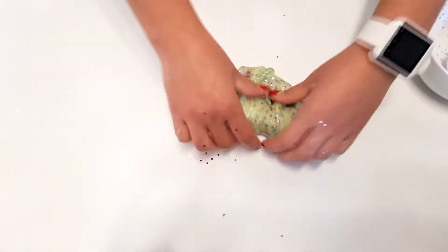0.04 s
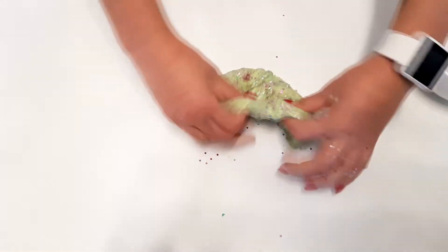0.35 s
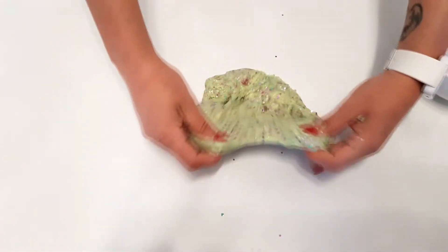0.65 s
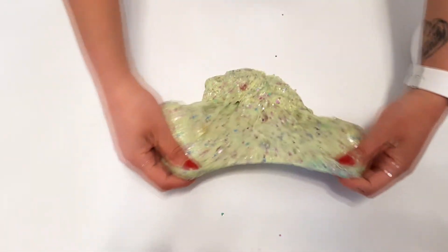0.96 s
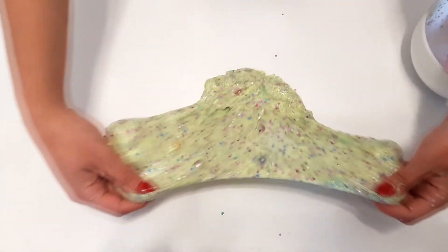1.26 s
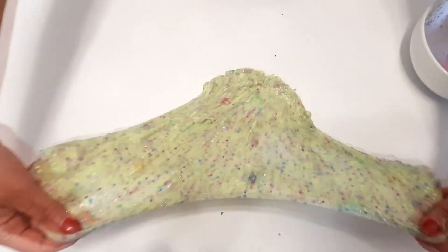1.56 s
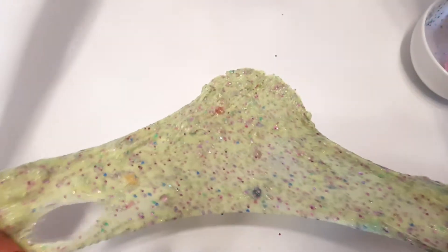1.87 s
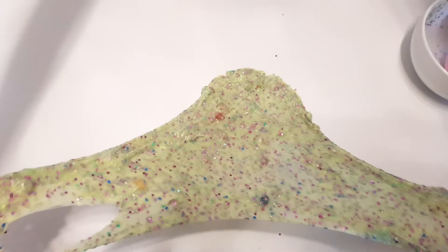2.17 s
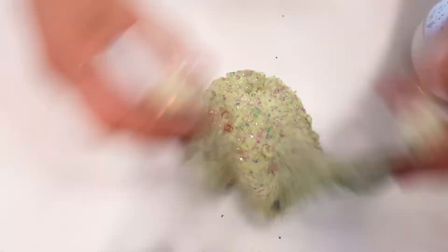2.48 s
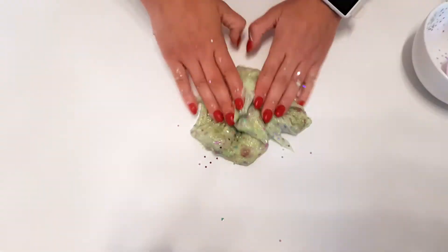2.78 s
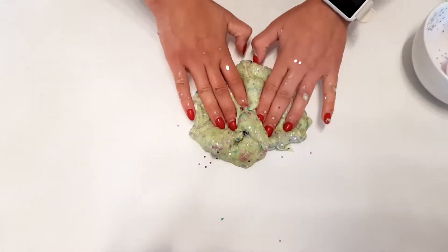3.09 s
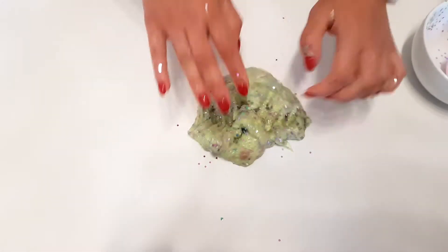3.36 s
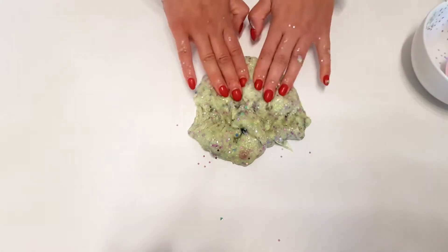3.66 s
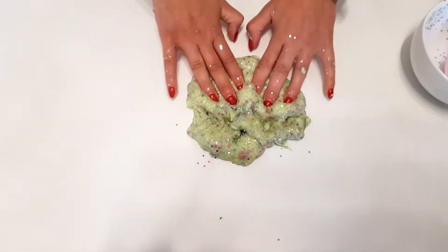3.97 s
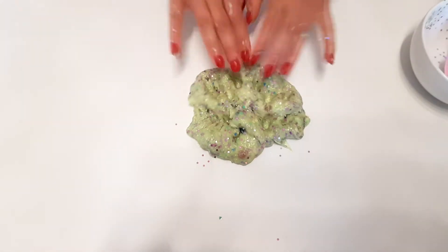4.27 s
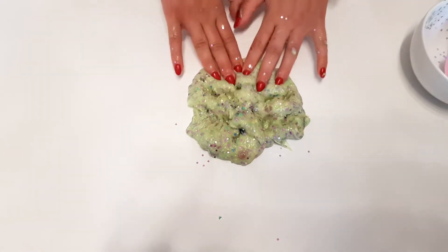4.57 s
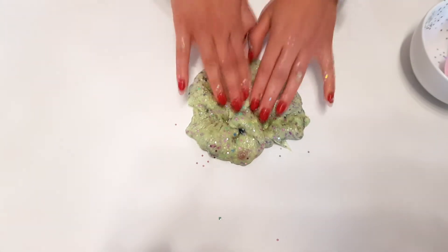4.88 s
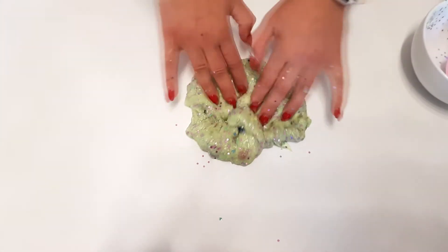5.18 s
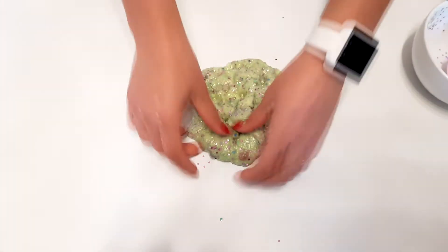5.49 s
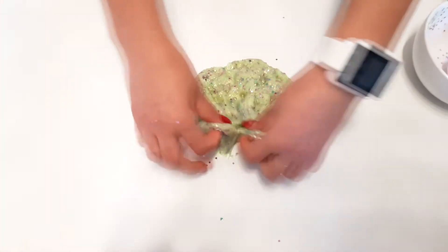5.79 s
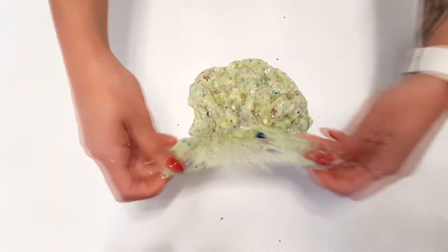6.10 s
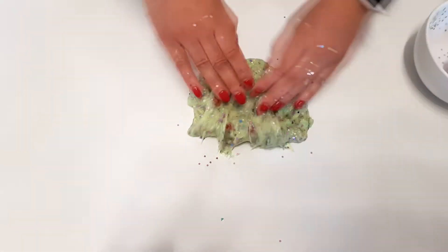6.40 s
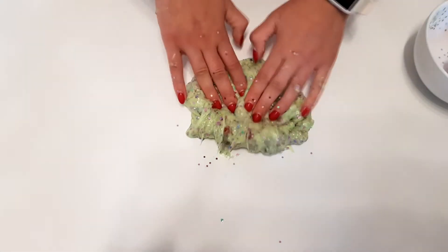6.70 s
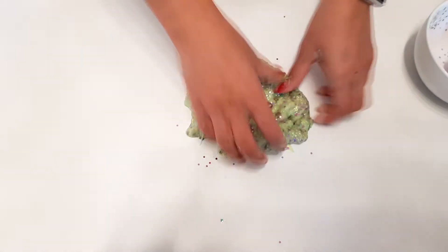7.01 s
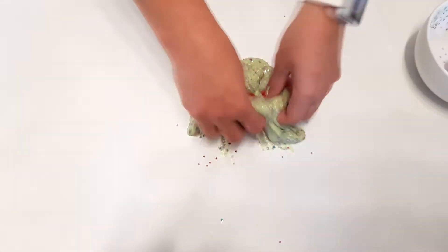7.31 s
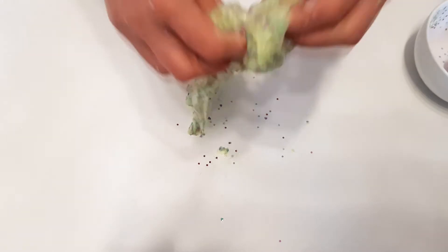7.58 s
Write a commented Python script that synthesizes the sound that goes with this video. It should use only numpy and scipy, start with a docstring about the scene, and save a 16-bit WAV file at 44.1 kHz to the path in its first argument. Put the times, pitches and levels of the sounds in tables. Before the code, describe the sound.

Two hands work sticky slime on a table, heard close up in a bare, reverberant room. It opens with a soft thud, a squelch and a few sharp bubble clicks. From about 0.5 to 2 seconds the slime is stretched, giving only a quiet, thinning crackle. At about 2.3 seconds it slaps down with a loud, wet thud. Fingers then press into it, with squelches, crisp snaps and small air pops around 3 seconds, and lighter sticky crackling until nearly 5 seconds. Wet smacks and folds follow from 5 to 5.7 seconds, then another brief stretch. From 6.5 seconds the kneading is denser, with a sharp, loud pop at 6.7, a hollow pop at 7 and squelching to the end near 7.8 seconds. Very faint bird whistles, insects and hiss lie behind, and a low rumble swells from about 4 seconds.

```python
"""Sticky slime is kneaded, stretched and folded by two hands on a table in a bare, lively room.
Tiny bubbles, each a damped oscillator, crackle as it peels off skin and table and squelch under the
fingers. Air pockets pop and ring as cavities, the stretched sheet slaps down, and the tabletop
shudders in its bending modes. The walls reverberate; birds, insects and a dull rumble lie faintly behind."""
import sys
import numpy as np
from scipy import signal
from scipy.fft import rfft, irfft, next_fast_len
from scipy.io import wavfile
from scipy.ndimage import uniform_filter1d

SR = 44100
rng = np.random.default_rng(int(sys.argv[2]) if len(sys.argv) > 2 else 0)


def generate_wav(signal):
    """Clip the signal to [-1, 1] and save it as 16-bit WAV at the path in sys.argv[1]."""
    frames = np.transpose(np.atleast_2d(signal))
    scaled = np.clip(frames, -1, 1) * 32767
    pcm = np.round(scaled).astype(np.int16)
    wavfile.write(sys.argv[1], SR, pcm)


N = 346185
TIME = np.arange(N) / SR

# spectra of dull push, wet squelch, sticky peel, wet smack and tearing pocket: f/Hz, level/dB
PUSH_SPECTRUM = [(30, -34), (60, -5.5), (90, -4.5), (120, -6.5), (160, -1.5), (235, 0), (330, -8.5),
                 (440, -4.5), (700, -3.5), (1100, -13), (2500, -60)]
SQUELCH_SPECTRUM = [(300, -25), (700, -2), (1000, 0.5), (1600, 1), (2500, -4), (4200, -5), (6000, -12.5),
                    (8000, -28), (16000, -53)]
PEEL_SPECTRUM = [(1000, -10), (3000, -6.5), (5000, -2), (6300, -4.5), (7500, -6), (9000, -1.5),
                 (12500, -0.5), (16000, -2.5)]
SMACK_SPECTRUM = [(150, -28.5), (600, -5.5), (1700, -1.5), (2600, -4), (4000, -13.5), (7000, -20),
                  (16000, -27)]
CRACK_SPECTRUM = [(200, -10.5), (750, 10), (1300, -29), (1800, 3), (2600, 1), (4200, -1.5), (6000, -1.5),
                  (7500, -9.5), (10000, -3.5), (16000, -21)]
# Event levels are relative: each source adds its own gain.
# finger squeezes: t/s at the height, build-up/s, let-go/s, push/dB, squelch/dB, peel/dB
SQUEEZES = [(0.0, .05, 0.17, -52, -53, -55.5), (.26, 0.094, 0.27, -70, -64, -67),
            (0.389, 0.056, 0.059, -68, -66, -57.5), (.74, 0.048, 0.084, -82, -72, -70),
            (2.365, 0.033, 0.14, -41, -45, -54), (2.43, 0.073, .22, -47.5, -47, -70),
            (2.629, 0.18, 0.1, -58.5, -52, -59.5), (2.81, 0.13, 0.21, -65.5, -57, -62),
            (2.957, 0.037, 0.23, -53.5, -48, -49.5), (3.179, 0.053, 0.02, -46.5, -43, -42.5),
            (3.51, 0.035, 0.2, -61.5, -58.5, -64), (3.65, 0.27, 0.092, -86, -61, -61.5),
            (3.86, 0.06, 0.11, -62, -56, -73), (4.015, 0.1, 0.051, -54, -58, -54),
            (4.35, 0.032, .14, -60.5, -56.5, -50), (4.585, 0.068, 0.074, -54, -59, -54),
            (4.869, 0.051, 0.27, -79, -63, -65.5), (5.018, 0.062, 0.11, -59.5, -51, -71),
            (5.135, 0.084, 0.029, -51.5, -58, -52.5), (5.443, 0.027, 0.095, -53.5, -54.5, -60.5),
            (5.549, 0.026, 0.068, -50, -53, -52), (5.621, 0.05, 0.099, -57, -54.5, -60.5),
            (5.699, .05, 0.11, -70, -57, -60), (6.48, 0.078, 0.2, -64, -70, -60.5),
            (6.56, 0.072, 0.12, -61, -50, -68), (6.671, 0.037, 0.26, -52.5, -51, -54),
            (6.88, .03, 0.12, -48.5, -48, -69), (7.0, .03, .15, -47, -49.5, -55),
            (7.101, 0.21, 0.15, -58, -49, -52), (7.265, 0.093, 0.067, -71, -49, -46.5),
            (7.345, 0.1, 0.2, -52.5, -50.5, -46), (7.42, 0.13, 0.072, -63, -51, -49),
            (7.724, 0.054, 0.071, -52, -47, -51.5)]
# the sheet is drawn out and peels off the table: start/s, end/s, level/dB
STRETCHES = [(0.498, 2.1, -67), (5.7, 6.08, -61)]
# weight of the palms rubbing over the table: t/s, level/dB
PALM_WEIGHT = [(0, -52), (.45, -85), (2.3, -81), (2.37, -56), (2.8, -78), (3.15, -69), (3.7, -74),
               (4.1, -64.5), (4.45, -73), (5.5, -60), (5.8, -64.5), (6.3, -62), (6.6, -53), (7.35, -49),
               (7.55, -61.5), (7.85, -56)]
# single bubbles snapping: t/s, level/dB, tick f/Hz, body offset/dB
SNAPS = [(0.0633, -38.5, 10200, -8.5), (0.2357, -47, 8970, -15), (0.249, -48, 10200, -4),
         (0.3316, -45, 11300, -13), (0.3812, -39, 12000, -11.5), (0.611, -45.5, 10900, -11.5),
         (0.7267, -42, 11200, -36), (1.019, -47, 14500, -22), (1.8633, -53.5, 8750, -8),
         (2.0682, -43.5, 9400, -40), (2.526, -32, 9300, -13), (2.597, -40.5, 9070, -18),
         (2.7708, -37.5, 11200, -33), (2.8881, -30.5, 11000, -17), (2.9419, -25.5, 12300, -8),
         (2.9779, -22.5, 13200, -13.5), (3.0615, -43, 12400, 2), (3.177, -35, 8650, -29),
         (3.5229, -36, 9200, -18), (3.592, -38.5, 11300, -33), (3.6473, -32.5, 11000, -11),
         (4.0076, -39, 11100, -5), (4.2538, -43, 12500, -20), (4.3173, -24.5, 10000, -14.5),
         (4.35, -45.5, 13600, 5), (4.3757, -41, 8450, -3), (4.5843, -38.5, 14400, -8),
         (4.779, -50, 9570, -40), (5.1276, -33, 8700, -8), (5.423, -43.5, 9600, -11),
         (5.5254, -44, 11600, -15), (5.689, -37, 12500, -19), (5.91, -40.5, 10500, -26),
         (6.428, -44, 8600, -11), (6.454, -44, 10400, -8), (6.4923, -38.5, 10100, -11),
         (6.866, -34.5, 11400, -10), (6.878, -34, 9870, -5.5), (6.9798, -34, 10600, -6),
         (7.091, -35, 12300, -21), (7.2364, -32, 11200, -11.5), (7.7324, -27.5, 12200, -12.5)]
# lumps and fingers landing: t/s, thud level/dB, thud f/Hz, smack level/dB
SLAPS = [(.002, -37, 202, -44), (.022, -38, 109, -63), (0.235, -47, 676, -57), (1.089, -74, 700, -62),
         (2.319, -50, 240, -36), (2.327, -29.5, 218, -39), (2.352, -24, 197, -22.5),
         (2.366, -23, 192, -26.5), (2.446, -38, 128, -43), (2.867, -41, 213, -46), (2.93, -44.5, 430, -39),
         (3.13, -40, 368, -51), (3.146, -35, 344, -46), (3.185, -44.5, 117, -44), (3.480, -44, 337, -44.5),
         (3.844, -70, 495, -45.5), (4.848, -44.5, 820, -61), (4.998, -36.5, 720, -44),
         (5.019, -35, 577, -39), (5.134, -42, 274, -49), (5.422, -36, 604, -56), (5.465, -36, 480, -43),
         (5.468, -37.5, 121, -50), (5.543, -41, 690, -36), (5.611, -35, 690, -53), (6.543, -45, 487, -47),
         (6.655, -38.5, 440, -35.5), (6.866, -38.5, 188, -36), (6.983, -32.5, 117, -35),
         (7.323, -45, 450, -39.5), (7.716, -52, 447, -36)]
# air pockets bursting: t/s, level/dB, cavity f/Hz, glide/(octave/s), T60/s, crack level/dB
POPS = [(.002, -42, 438.4, 0, 0.16, -56), (2.998, -41.5, 766, 5, 0.02, -27.5),
        (3.132, -40.5, 390, 2.5, 0.12, -58), (3.179, -40, 425, 3, 0.1, -20.5),
        (3.481, -45, 356, 1.5, .16, -54), (6.7145, -28.5, 450, 3, 0.22, -10.5),
        (6.9808, -23.5, 668, -85, 0.072, -24.5), (6.994, -29, 366, 5, 0.078, -44)]
# reverberation time of the room: f/Hz, T60/s
ROOM_T60 = [(100, 0.35), (400, 0.46), (1500, 0.68), (4000, 0.56), (9000, 0.45), (15000, 0.27)]
# standing waves of the room: f/Hz, bandwidth/Hz, gain/dB
ROOM_MODES = [(109.4, 6.6, 10), (210, 26, 1), (271, 16, 3), (423, 98, 7)]
# a distant bird's whistles: t/s, level/dB
WHISTLES = [(3.204, -64.5), (3.601, -60.5), (4.062, -63), (4.532, -62.5), (4.999, -64)]
# pitch of a whistle, a short rise and a long fall: t/s into the call, f/Hz
WHISTLE_PITCH = [(0, 2950), (.036, 3160), (.12, 2780), (.185, 2350)]
# a second bird's double pips: t/s, level/dB
PIPS = [(.863, -72), (1.117, -79), (1.517, -72.5), (2.219, -71.5)]
# pitch of one pip: t/s into the pip, f/Hz
PIP_PITCH = [(0, 3840), (.022, 3920), (.052, 3720)]
# raspy sliding bird notes: t/s, duration/s, first f/Hz, last f/Hz, level/dB
RASPS = [(0.366, 0.079, 4580, 5320, -60.5), (1.262, 0.09, 4650, 5250, -69.5), (1.7, .45, 2825, 2540, -81.5),
         (6.142, 0.15, 4620, 5260, -71)]
# swell of the hollow rumble: t/s, level/dB
RUMBLE_SWELL = [(4.1, -87), (4.3, -65), (4.8, -59.5), (5.3, -60), (5.85, -58.5), (6.4, -52.5), (7.2, -54.5),
                (7.85, -52)]
# spectrum of the rumble: f/Hz, level/dB
RUMBLE_SPECTRUM = [(40, -20), (70, 0.5), (130, -9.5), (220, -5.5), (340, -9), (600, -5), (1000, -12),
                   (1700, -15), (2500, -33), (6000, -57)]
# resonances of the rumble: f/Hz, bandwidth/Hz, gain/dB
RUMBLE_MODES = [(173, 11, 8), (218, 9.4, 13), (259, 12, 12.5)]
# an insect's short chirrs: t/s at the middle, level/dB
CHIRRS = [(.3, -78), (.75, -75), (1.11, -78), (1.62, -79), (2.0, -83), (3.39, -81), (4.199, -79),
          (4.94, -74), (5.36, -77), (6.13, -87)]
# spectrum of still room air and microphone hiss: f/Hz, level/dB
AIR_SPECTRUM = [(25, -37), (45, 1), (75, 1), (150, -4), (300, -12), (700, -16.5), (1500, -23), (3200, -25),
                (5000, -20), (8000, -21.5), (10500, -18), (16000, -17.5)]
# stereo width: f/Hz, gain of side against mid/dB
STEREO_WIDTH = [(60, -11), (130, -12), (220, -12), (400, -9.5), (700, -4.5), (1200, 1), (6000, 0),
                (9000, 1.5), (16000, 1.5)]
# stereo balance: f/Hz, gain of left against right/dB
STEREO_BALANCE = [(60, -3.5), (110, 0), (200, -2), (380, -1.5), (700, 0), (1290, -6), (2380, -1),
                  (4400, -5.5), (8120, 3), (15000, 1.5)]


def kneading():
    """Superposed bubble swarms in three bands give the dull push, wet squelch and fine peeling crackle."""
    pushing, squelching, peeling = hand_effort()
    push = bubble_swarm(pushing, PUSH_SPECTRUM, per_s=700, spread_db=0, crowding=.2,
                        low_hz=59.8, high_hz=1213, cycles=2.87)
    squelch = bubble_swarm(squelching, SQUELCH_SPECTRUM, per_s=2500, spread_db=3.5, crowding=.3,
                           low_hz=609, high_hz=6950, cycles=2.27)
    peel = bubble_swarm(peeling, PEEL_SPECTRUM, per_s=8000, spread_db=1.5, crowding=.5,
                        low_hz=3050, high_hz=15050, cycles=5.6)
    return amp(1.0) * push + amp(-2.5) * squelch + amp(0.65) * peel


def hand_effort(swing_db=20, thinning_db_per_s=13, edge_s=0.036):
    """Incoherent sources add in power: rubs, squeezes and stretches sum to push, squelch, peel gains."""
    power = np.outer([amp(-7), amp(-12.5), 0], envelope(PALM_WEIGHT)) ** 2  # rubbing peels nothing
    for s, build_s, let_go_s, *levels_db in SQUEEZES:
        away = np.maximum((s - TIME) / build_s, (TIME - s) / let_go_s)
        near = away < 4
        power[:, near] += np.outer(amp(levels_db), amp(-swing_db * away[near])) ** 2
    for start, end, db in STRETCHES:
        pulling = np.clip(np.minimum(TIME - start, end - TIME) / edge_s + 1, 0, 1)
        thinning = amp(db - thinning_db_per_s * (TIME - start))
        power += np.outer([0, amp(-6.5), 1], pulling * thinning) ** 2
    return np.sqrt(power)


def bubble_swarm(effort, spectrum, per_s, spread_db, crowding, low_hz, high_hz, cycles, bands=24):
    """Shot noise: bubbles ring as damped oscillators at random times, more often under harder work."""
    out, t = np.zeros((2, N)), np.arange(1024) / SR
    chance = (effort / effort.max()) ** crowding
    per_band = int(per_s * N / SR / bands)
    for hz in np.geomspace(low_hz, high_hz, bands):
        when, size, side, luck = rng.random((5000, 4))[:per_band].T
        at = (when * (N - 1)).astype(int)
        strength = amp(spread_db * np.minimum(-np.log(size + 1e-9), 3.5))
        strength *= (luck < chance[at]) / np.sqrt(chance[at] + 1e-9)  # sparser at equal mean power
        impulses = np.zeros((2, N))
        impulses[:, at] = strength * np.array([.5 + side, 1.5 - side])
        bubble = np.sin(2 * np.pi * (hz * t + rng.random((2, 1)) / 2)) * np.exp(-hz * t / cycles)
        out += hz * signal.oaconvolve(impulses, bubble, axes=1)[:, :N]
    return unit(colour(out, spectrum)) * effort


def snaps():
    """Impulse excitation: a thin bubble wall tears, giving a bright tick over a short, lower body."""
    out = np.zeros((2, N))
    for s, db, hz, body_db in SNAPS:
        tick = colour(ring(crack(t60=0.014, shared=0.027, spike_db=12), hz, q=2.7), PEEL_SPECTRUM)
        body = ring(crack(t60=0.025, shared=0.16, spike_db=9), 3940, q=0.8)
        add(out, s + .0005, at_peak(tick, db + 2.0) + at_peak(body, db + body_db + 6.5))
    return out


def slaps():
    """Inelastic impact: slime lands with a damped thud, longer when deeper, and a wet smack."""
    out = np.zeros((2, N))
    for s, db, hz, smack_db in SLAPS:
        impact = burst(t60=0.055 * np.sqrt(400 / hz), shared=0.82)
        thud = ring(ring(impact, hz, q=2.23), hz, q=0.2)
        closing = np.clip(np.arange(len(thud[0])) / SR / 0.0024, 0, 1)  # wet faces meet over a few ms
        smack = colour(closing * burst(t60=0.067, shared=0.19), SMACK_SPECTRUM)
        add(out, s, at_peak(thud, db - 2.0) + at_peak(smack, smack_db - .5))
    return out


def pops():
    """Cavity resonance: an air pocket cracks open and rings, gliding in pitch as it changes shape."""
    out, t = np.zeros((2, N)), np.arange(SR // 4) / SR
    for s, db, hz, glide, t60, crack_db in POPS:
        pitch = hz * 2 ** (glide * t)
        cavity = sine(pitch) * decay(t, t60)
        puff = ring(burst(t60=0.091, shared=0.55), hz * 0.977, q=4.5)
        tear = colour(crack(t60=0.03, shared=0.93, spike_db=19.0), CRACK_SPECTRUM)
        add(out, s, amp(db - 3.5) * cavity + at_peak(puff, db - 7.0) + at_peak(tear, crack_db - 3.86))
    return out


def crack(t60, shared, spike_db):
    """Rupture transient: a wall gives way in one pressure spike, then a brief spatter."""
    spatter = burst(t60, shared)
    spatter[:, 0] += amp(spike_db)
    return spatter


def burst(t60, shared):
    """Partial coherence: a dying puff of noise with a share of its power common to both channels."""
    t = np.arange(SR // 4) / SR
    common, *own = rng.standard_normal((3, len(t)))
    return (np.sqrt(shared) * common + np.sqrt(1 - shared) * np.array(own)) * decay(t, t60)


def tabletop():
    """Forced vibration: the palms shake the tabletop's three lowest bending modes."""
    shove = rng.standard_normal((2, N))
    modes = ring(ring(shove, 51.5, q=3.5), 49.6, q=2.4)
    modes += 0.98 * ring(ring(shove, 69.0, q=5.9), 74.0, q=3.2)
    modes += 0.19 * ring(ring(shove, 103, q=1.5), 100, q=1.6)
    return amp(0.5) * unit(modes) * envelope(PALM_WEIGHT)


def room(direct, wet_db):
    """Reverberation: dense wall echoes last longest in the midrange, and a few standing waves stand out."""
    echoes = rng.choice([-1., 1.], (2, SR)) * (rng.random((2, SR)) < .12)
    hz, t, spectra = signal.stft(echoes, SR, nperseg=256)
    tail = signal.istft(spectra * decay(t, at_hz(ROOM_T60, hz)[:, None]), SR, nperseg=256)[1]
    tail *= np.clip(np.arange(tail.shape[1]) / SR / 0.0046, 0, 1) ** 2  # near walls answer after a few ms
    tail /= np.sqrt((tail ** 2).sum(1, keepdims=True))
    tail = resonate(tail, ROOM_MODES)
    return direct + amp(wet_db) * signal.oaconvolve(direct, tail, axes=1)[:, :N]


def birds(pip_gap_s=.064):
    """Gliding tones from outdoors: birds give falling whistles, double pips and rasps."""
    out = np.zeros((2, N))
    for s, db in WHISTLES:
        add(out, s, bird_note(WHISTLE_PITCH, db, rasp=.012))
    for s, db in PIPS:
        for delay in (0, pip_gap_s):
            add(out, s + delay, bird_note(PIP_PITCH, db, rasp=0.0045))
    for s, length, first_hz, last_hz, db in RASPS:
        add(out, s, bird_note([(0, first_hz), (length, last_hz)], db, rasp=0.045))
    return out


def bird_note(contour, db, rasp):
    """Frequency modulation: fast random flutter roughens a thin whistle along its pitch contour."""
    t = np.arange(0, contour[-1][0], 1 / SR)
    flutter = unit(uniform_filter1d(rng.standard_normal(SR), 90))[:len(t)]
    pitch = np.interp(t, *np.transpose(contour)) * (1 + rasp * flutter)
    arch = np.sqrt(abs(np.sin(np.pi * t / t[-1])))
    return amp(db) * sine(pitch) * arch * amp([[1.5], [-2.5]])  # to the left


def rumble():
    """Resonant filtering: dull noise swells and drones on a few low resonances."""
    noise = colour(rng.standard_normal((2, N)), RUMBLE_SPECTRUM)
    return unit(resonate(noise, RUMBLE_MODES)) * envelope(RUMBLE_SWELL)


def insects_and_air():
    """Narrow-band noise sounds pitched: a steady insect shrill and short chirrs over broadband air."""
    air, shrill, chirr = rng.standard_normal((3, 2, N))
    shrill = unit(ring(ring(shrill, 6170, q=14), 6170, q=14))
    chirr = unit(ring(ring(chirr, 6950, q=22), 6950, q=22))
    swell = amp(-77) + sum(amp(db + 4.5) * np.exp(-((TIME - s) / 0.031) ** 2) for s, db in CHIRRS)
    return amp(-66.5) * unit(colour(air, AIR_SPECTRUM)) + amp(-72.5) * shrill + swell * chirr


def colour(x, spectrum):
    """Minimum-phase filter: it imposes a spectrum causally, so attacks stay sharp."""
    size = 4096
    log_gain = np.log(amp(at_hz(spectrum, abs(np.fft.fftfreq(size, 1 / SR)))))
    taps = np.fft.ifft(np.exp(np.conj(signal.hilbert(log_gain)))).real[:size // 2]
    return signal.oaconvolve(x, taps[None], axes=1)[:, :x.shape[1]]


def ring(x, hz, q):
    """Second-order resonator of quality factor q."""
    hz = min(hz, .45 * SR)
    return signal.lfilter(*signal.iirpeak(hz, max(q, 2.5 * hz / SR), fs=SR), x)


def resonate(x, modes):
    """Parallel resonators lift a narrow band at each mode."""
    return x + sum((amp(db) - 1) * ring(x, hz, q=hz / width) for hz, width, db in modes)


def sine(hz):
    """Phase is the integral of frequency."""
    return np.sin(2 * np.pi * np.cumsum(hz) / SR)


def decay(t, t60):
    """Exponential damping, 60 dB in t60 seconds."""
    return np.exp(-np.log(1000) * t / t60)


def envelope(points):
    """Gain over time, interpolated in decibels."""
    return amp(np.interp(TIME, *np.transpose(points)))


def at_hz(points, hz):
    """Interpolation on a log-frequency axis."""
    f, value = np.transpose(points)
    return np.interp(np.log(hz + 1), np.log(f + 1), value)


def amp(db):
    """Amplitude ratio of a level in decibels."""
    return 10 ** (np.asarray(db) / 20)


def unit(x):
    """Normalisation to rms 1."""
    return x / np.sqrt(np.mean(x ** 2) + 1e-20)


def at_peak(x, db):
    """Peak normalisation by the mean of the six largest magnitudes."""
    return amp(db) * x / np.sort(abs(x).ravel())[-6:].mean()


def add(mix, s, sound):
    """Superposition of a stereo sound at time s."""
    part = mix[:, max(round(s * SR), 0):][:, :sound.shape[1]]
    part += sound[:, :part.shape[1]]


def scene():
    """Linear superposition: slime and birds reverberate; tabletop, rumble, insects and air add directly."""
    slime = room(kneading(), wet_db=-1.46) + room(snaps(), wet_db=-2.5)
    slime = slime + room(slaps(), wet_db=0.5) + room(pops(), wet_db=-4.0)
    return slime + tabletop() + rumble() + room(birds(), wet_db=-4.5) + insects_and_air()


def record(dry):
    """Mid-side stereo: two close, band-limited microphones differ in colour, nearly alike in the bass."""
    size = next_fast_len(N + 4096)
    hz = np.fft.rfftfreq(size, 1 / SR)
    left, right = rfft(dry, size)
    mid = (left + right) / 2
    side = (left - right) / 2 * amp(at_hz(STEREO_WIDTH, hz))
    lean = amp(at_hz(STEREO_BALANCE, hz) / 2)
    pair = irfft(np.array([(mid + side) * lean, (mid - side) / lean]), size)[:, :N]
    lowpass = signal.firwin(401, cutoff=16200, window=("kaiser", 9), fs=SR)
    return signal.oaconvolve(pair, lowpass[None], "same")


dry = scene()
out = record(dry)
generate_wav(out)
```